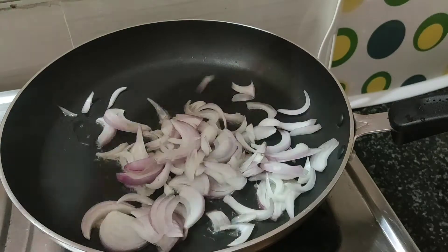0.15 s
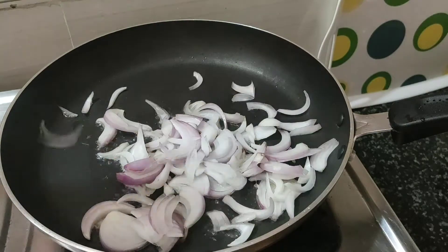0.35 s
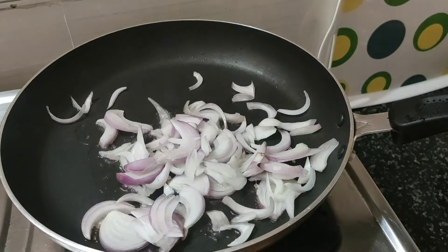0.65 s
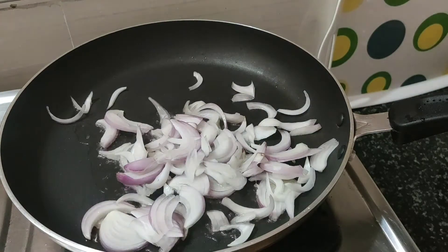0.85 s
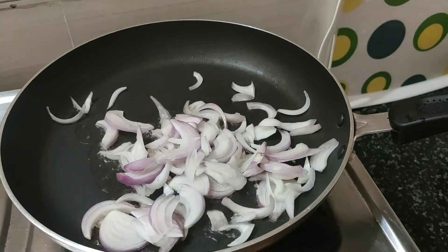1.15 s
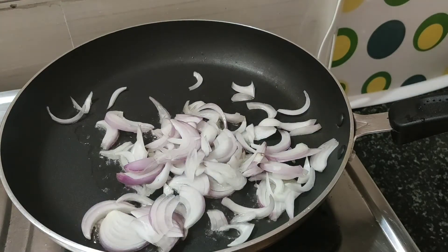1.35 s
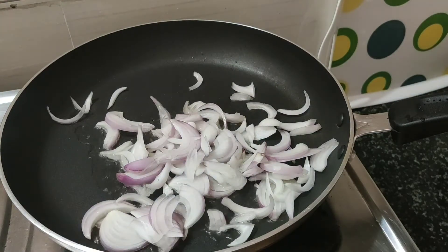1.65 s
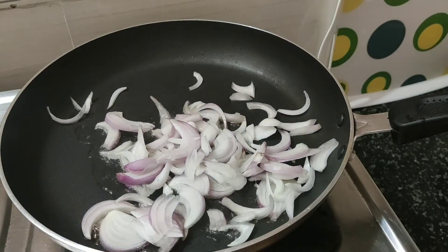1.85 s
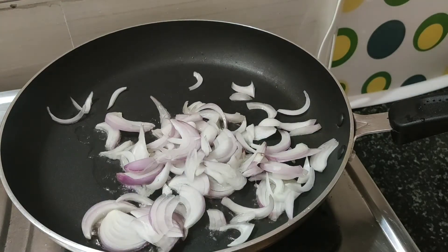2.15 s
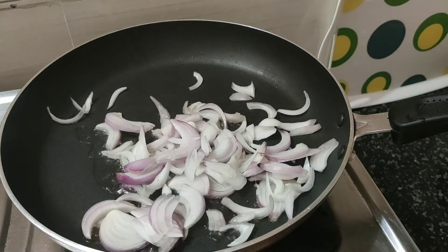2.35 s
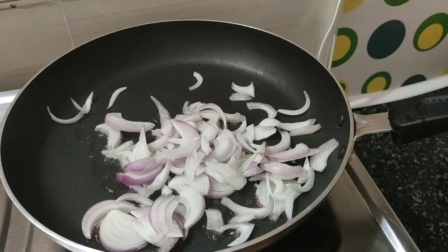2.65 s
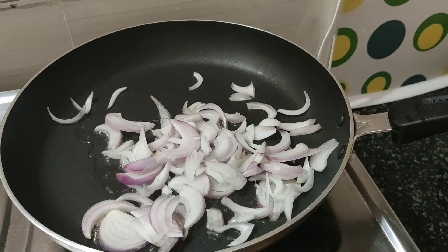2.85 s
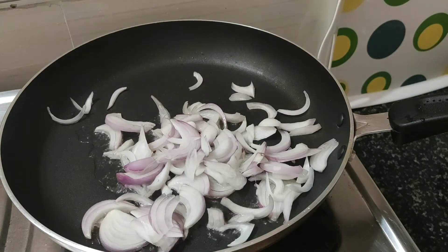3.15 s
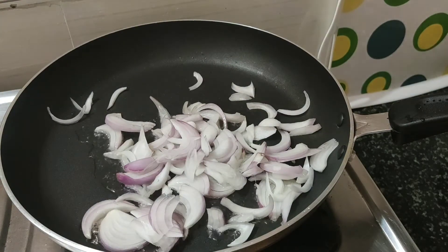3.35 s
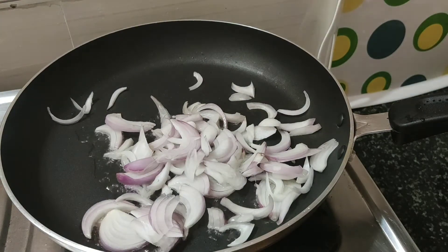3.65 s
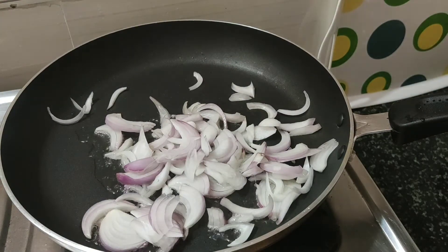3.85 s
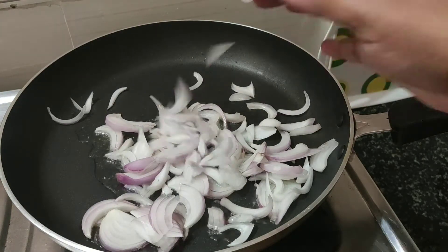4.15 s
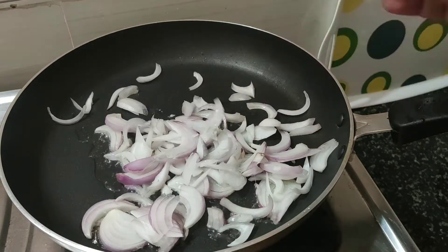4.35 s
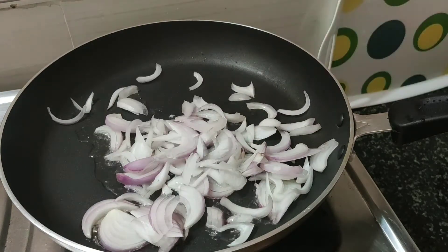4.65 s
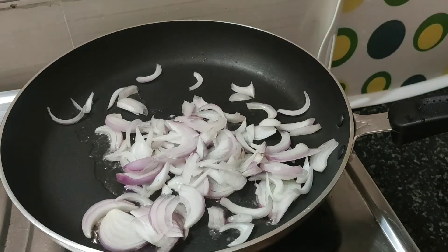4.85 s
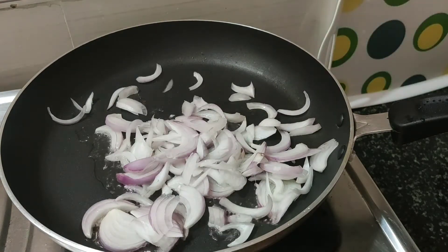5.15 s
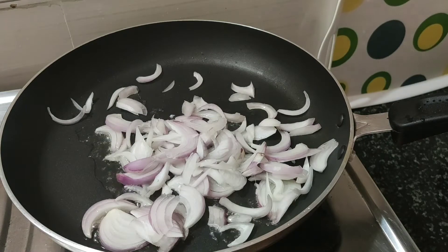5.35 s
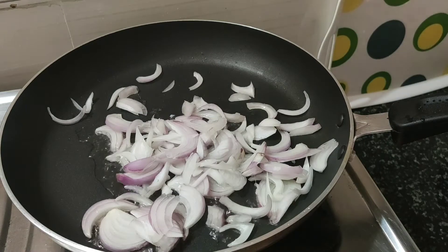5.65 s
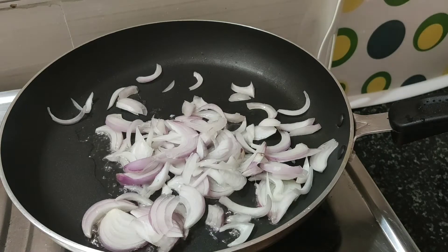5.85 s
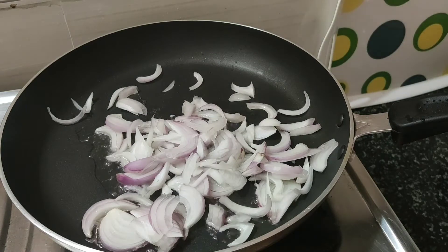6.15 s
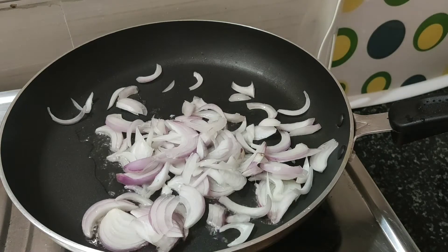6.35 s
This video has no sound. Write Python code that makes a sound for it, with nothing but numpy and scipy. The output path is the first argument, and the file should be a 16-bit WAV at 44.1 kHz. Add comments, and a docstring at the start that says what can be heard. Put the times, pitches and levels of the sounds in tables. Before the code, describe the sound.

Onion slices fry in hot oil, heard very close in a small tiled kitchen with short reflections. From 0 to about 0.5 s the sizzle is at its fiercest: bright, wide, grainy hiss crowded with sharp spits and a few dull ticks from the pan, one strong crack near 0.5 s. Over the next two seconds it sinks to a steady, crisp simmer with finer crackle and occasional pops. A quiet low hum underneath fades almost away around 3.1 s, then returns. A very sharp pop snaps at 3.4 s, toward the right. From about 4.5 s the sizzle swells gently. At 5.3 s, after a spit and a tiny gritty scrape, a utensil lands with a loud hard clack, bounces in quick clatters and rocks to rest with duller knocks by 5.6 s, ringing briefly. Simmering and small spits continue to about 6.5 s.

```python
"""Sliced onions sizzle in a frying pan, close to a phone in a small tiled kitchen.
At first the sizzle flares, as resonant bursts of thousands of steam bubbles, and drops spit as noise bursts.
It then settles to a simmer, over a low hum of two beating tones that nearly cancel about halfway through.
Near the end late slices swell the sizzle, and a utensil scrapes, lands, bounces and rocks to rest:
each contact sums damped modes and decaying noise."""
import sys
import numpy as np
from scipy import signal
from scipy.fft import rfft, irfft
from scipy.io import wavfile
from scipy.ndimage import uniform_filter1d

SR = 44100
rng = np.random.default_rng(int(sys.argv[2]) if len(sys.argv) > 2 else 0)


def file_out(sig):
    """Save sig as 16-bit WAV at sys.argv[1]."""
    # one column per channel
    cols = np.atleast_2d(sig).T
    # limit, then scale
    lim = np.clip(cols, -1, 1)
    pcm = np.round(lim * 32767).astype(np.int16)
    wavfile.write(sys.argv[1], SR, pcm)


N = 286650
T = np.arange(N) / SR

# Spectra of the low rumble and of the draught: f/Hz, relative level/dB
RUMBLE_SPECTRUM = [(35, -20), (55, -12), (80, 5.5), (105, 6), (130, 0.5), (165, -16), (225, -28.5),
                   (300, -19), (370, -27), (470, -33), (600, -19)]
DRAUGHT_SPECTRUM = [(12, -9), (25, 2.5), (38, -26), (60, -9)]
# Course of the draught: t/s, relative level/dB
DRAUGHT_COURSE = [(0.0, -61), (1.47, -61), (1.74, -67), (2.75, -58.5), (3.12, -63.5), (3.7, -59.5),
                  (4.74, -55.5), (5.94, -67), (6.14, -65), (6.5, -64)]
# Difference between the two microphones: f/Hz, side minus mid level/dB
SIDE_SPECTRUM = [(25, -30), (100, -45), (200, -16), (300, -4), (600, -6.5), (1000, 1), (1500, 1),
                 (3000, -0.5), (5200, 3.5), (7000, -0.5), (15000, -0.5)]
# Modes of the utensil: f/Hz, relative level/dB, reverberation time t60/s
UTENSIL_MODES = [(70.6, -4, 0.54), (230.5, -4, 0.31), (273, -0.5, 0.15), (473, 5.5, 0.15), (566, -3, 0.28),
                 (834, 2, 0.25), (927, -1, 0.19), (975, 5, 0.19), (1015, -1, 0.23), (1135, 7, 0.14),
                 (1370, 1, 0.17), (2306, 0.5, 0.19), (3760, -5, 0.08), (4135, -2, 0.16), (4470, -2, 0.11),
                 (4580, 1, 0.24), (5520, 2.5, 0.13), (6300, 0.5, 0.093), (6400, 3, 0.16)]
# Spectra of the utensil's clatter and of its hard clack: f/Hz, relative level/dB
CLATTER_SPECTRUM = [(180, -25), (230, -2), (320, 1.5), (385, -8), (460, -13), (680, -3.5), (850, 2),
                    (1150, 4), (1450, -3.5), (1950, -5.5), (2250, -6), (2900, -12), (3700, -6), (4500, 2),
                    (5500, -16), (5900, -34), (7000, -13)]
CLACK_SPECTRUM = [(800, 12), (1200, 17), (1700, -8), (2400, -8), (3000, -20), (3400, 7.5), (4500, 10.5),
                  (5500, 9), (5950, -20)]
# Contacts as the utensil lands, bounces and rocks to rest with dull knocks:
# t/s, strength level/dB, treble level/dB, relative clack level/dB
UTENSIL_CONTACTS = [(5.3409, 4, 3, 3.5), (5.3571, -1.5, -2, -6), (5.417, 0, 3, -2.5), (5.4624, -1.5, 3, 2),
                    (5.489, -5, 6.5, 1), (5.5052, -4, 6, -1), (5.518, -7.5, 0, 7), (5.527, -6, -7, 8),
                    (5.534, -7.5, -2, -6), (5.554, -8, -15, -3), (5.584, -7, -19, 2),
                    (5.598, -8.5, -19, -3), (5.616, -13, -14, -2)]
# Soft bumps: t/s, relative level/dB
SOFT_BUMPS = [(0.327, -47), (0.487, -47), (2.127, -51), (5.248, -48), (5.676, -45)]
# Duller ticks of onion and oil on the pan: t/s, relative peak level/dB, resonance f/Hz
PAN_TICKS = [(0.0467, -22, 2600), (0.132, -29, 2910), (0.4313, -18.5, 2650), (0.446, -24, 2600),
             (0.495, -25, 3000), (0.607, -32.5, 1570), (1.45, -32, 2050), (2.529, -33, 2860),
             (2.887, -29, 1700), (2.897, -37, 1720), (4.231, -32.5, 1200)]
# Blunt snaps of the biggest bursts: t/s, peak level/dB, left minus right level/dB
BURST_SNAPS = [(0.0493, -19, 1), (0.4317, -31, 0), (3.3859, -17.5, -19)]
# Loudest spitting drops: t/s, relative crack peak level/dB, resonance f/Hz,
# relative steam fizz level/dB, boil-off time constant/s, relative unpitched splash level/dB
SPITTING_DROPS = [(0.0075, -1, 9000, -18, 0.0044, 2), (0.0456, 7, 7100, -13.5, 0.0035, -2),
                  (0.073, -3, 9500, -25, 0.012, 5), (0.091, -7, 5450, -21, 0.0046, -16),
                  (0.118, 1, 9500, -22, 0.012, 6), (0.1334, -1, 6070, -17.5, 0.0054, -5),
                  (0.160, 2.5, 10000, -20, 0.012, -2), (0.188, -11, 7300, -28, 0.004, -17),
                  (0.216, -10, 9000, -30, 0.0066, -16), (0.303, -13, 11500, -25.5, 0.01, -21),
                  (0.335, -6, 12500, -25, 0.0033, -19), (0.3631, -4, 6600, -24.5, 0.005, -22),
                  (0.4960, 9, 10100, -18, 0.0083, 7), (0.787, -8, 10400, -26, 0.0033, -5),
                  (0.833, -8, 5100, -20.5, 0.01, -8), (0.866, 1, 10500, -31, 0.007, -1),
                  (0.945, -9, 10000, -29, 0.01, -16), (1.143, -18, 5050, -33, 0.005, -20),
                  (1.215, -14, 9150, -30, 0.0087, -15), (1.394, -15, 6620, -29, 0.005, -20),
                  (1.4505, -10, 7400, -25, 0.005, 11), (1.498, -13, 6500, -28, 0.01, 3),
                  (1.613, -6, 12500, -24.5, 0.01, -11), (1.8986, -15, 7880, -30, 0.01, -1),
                  (2.6787, -3, 8890, -39, 0.004, -2), (2.782, -1, 8200, -32, 0.004, -6),
                  (2.7925, -11, 7800, -26.5, 0.006, -10), (3.1552, -2, 5250, -32, 0.009, -17),
                  (3.1933, -5, 7980, -37, 0.006, -13), (3.3852, 11, 5600, -18.5, 0.0083, -10),
                  (3.454, -6, 8000, -30, 0.0064, -18), (3.8724, -8.5, 4400, -30, 0.007, -14),
                  (4.224, -3.5, 7400, -27, 0.0073, 3), (5.258, 5, 6700, -27.5, 0.011, -11),
                  (5.89, -22, 4040, -30, 0.02, -8), (6.0128, -1, 10500, -32, 0.004, -2),
                  (6.111, -17, 5510, -37, 0.003, -18), (6.209, -10, 5100, -33, 0.0056, -18),
                  (6.4334, -6, 5030, -27, 0.0066, -12)]
# Spectra of the dry clicks, crackle, sputter and sizzle: f/Hz, relative level/dB
PRICK_SPECTRUM = [(1800, -5), (3500, -61), (7000, -2), (11000, 13.5), (15500, -18)]
CRACKLE_SPECTRUM = [(220, -20), (300, 3.5), (390, -8.5), (490, -0.5), (550, -8.5), (650, 4), (790, -4.5),
                    (890, 2.5), (990, 3), (1100, -5), (1280, -7.5), (1480, -0.5), (1750, -1.5), (2300, 3)]
SPUTTER_SPECTRUM = [(2200, -11), (2850, 3), (3500, 6), (4000, 0.5), (5200, 8.5), (6500, -4)]
SIZZLE_SPECTRUM = [(1200, -17.5), (1500, -13.5), (1750, -18), (2100, -11), (2550, -10.5), (2900, -8.5),
                   (4200, -7.5), (5200, -6.5), (7000, -0.5), (8300, 1), (10000, 0.5), (12000, -0.3),
                   (14200, -2), (15800, -0.5), (16400, -58)]

# The hum: two nearly equal tones, with the moment at which they cancel
HUM_HZ, HUM_DB, HUM_BEAT_HZ, HUM_NULL_S, HUM_MISMATCH = 100.6, -47.5, 0.23, 3.104, 0.02
RUMBLE_DB = -52  # at the top of a beat
# The scrape before the utensil lands
SLIDE_S, SLIDE_DB, SLIDE_GRAINS_PER_S = 0.029, -31.5, 3200
# The flare as the onions meet the oil has halved, in dB, after FLARE_S
SIMMER_DB, FLARE_DB, FLARE_S = -36, 8.5, 1
# The swell as a few late slices heat through
SWELL_AT_S, SWELL_DB, SWELL_WIDTH_S = 5.41, 3, 0.94
TOP_HZ = 16000


def undb(db):
    """Amplitude ratio: ten to the level in decibels over twenty."""
    return 10 ** (np.asarray(db) / 20)


def unit(x):
    """Normalization to unit root-mean-square value."""
    return x / np.sqrt(np.mean(x ** 2))


def decay(t, t60):
    """Exponential decay: the amplitude falls by 60 dB in the time t60."""
    return np.exp(-np.log(1000) * t / t60)


def balance(left_minus_right_db):
    """Intensity stereo: a level difference shared equally between two channels."""
    return undb(np.array([[left_minus_right_db], [-left_minus_right_db]]) / 2)


def response(points, size):
    """Frequency response: levels interpolated along logarithmic frequency at the transform bins."""
    hz, db = np.transpose(points)
    bins_hz = np.fft.rfftfreq(size, 1 / SR) + 1
    return undb(np.interp(np.log(bins_hz), np.log(hz), db))


def colour(x, points):
    """Linear filtering: a spectrum is imposed, with steep skirts beyond its end points."""
    size = x.shape[-1] + SR // 10
    hz = np.fft.rfftfreq(size, 1 / SR) + 1
    lowest_hz, highest_hz = points[0][0], points[-1][0]
    skirts = np.minimum(1, np.minimum(hz / lowest_hz, highest_hz / hz)) ** 4
    filtered = irfft(rfft(x, size) * response(points, size) * skirts, size)
    return filtered[..., :x.shape[-1]]


def band(x, hz, q):
    """Resonance: a second-order peak, with its frequency and bandwidth kept below SR / 3."""
    limit_hz = SR / 3
    hz = min(hz, limit_hz)
    b, a = signal.iirpeak(hz, max(q, hz / limit_hz), fs=SR)
    return signal.lfilter(b, a, x)


def walk(rate):
    """Slow random fluctuation: random steps at a given rate, smoothed twice, with rms 1."""
    size = int(SR / rate)
    steps = np.repeat(rng.standard_normal(N // size + 1), size)
    smooth = uniform_filter1d(uniform_filter1d(steps, size), size)
    return unit(smooth[:N])


def add(out, s, sound):
    """Superposition: a sound is summed in from a given time in seconds."""
    start = max(int(s * SR), 0)
    out[:, start:start + sound.shape[1]] += sound[:, :N - start]


def ports(pair):
    """Spatial coherence: long waves reach both microphones alike, short ones differ."""
    middle = pair[0] + pair[1]
    side = irfft(rfft(pair[0] - pair[1]) * response(SIDE_SPECTRUM, N), N)
    return (middle + np.array([side, -side])) / 2


def kitchen(x, pan_db, room_db):
    """Reverberation: the direct path, quick echoes off pan and tiles, and the longer room tail."""
    t = T[:SR // 3]
    near, far = rng.standard_normal((2, 2, len(t)))
    paths = np.zeros_like(near)
    # the direct sound reaches the left microphone up to 9 samples late
    paths[0, rng.integers(0, 10)] = 1
    paths[1, 0] = 1
    for noise, db, t60 in ((near, pan_db, .04), (far, room_db, .28)):
        tail = noise * decay(t, t60)
        paths += undb(db) * unit(tail) / np.sqrt(len(t))
    paths = paths / np.sqrt(np.sum(paths ** 2) / 2)
    return signal.fftconvolve(x[None], paths, axes=1)[:, :len(x)]


def stove(waver_rad=0.18, flutter_db=0.1, draught_db=7):
    """Beats: two close tones interfere; hum and rumble fade together, over a slow draught."""
    phase = 2 * np.pi * HUM_HZ * T + waver_rad * walk(14)
    slip = 2 * np.pi * HUM_BEAT_HZ * (T - HUM_NULL_S)
    beat = 1 - (1 - HUM_MISMATCH) * np.exp(-1j * slip)
    hum = np.imag(beat * np.exp(1j * phase)) * undb(HUM_DB + flutter_db * walk(8))
    rumble = unit(colour(ports(rng.standard_normal((2, N))), RUMBLE_SPECTRUM))
    rumble = rumble * np.sqrt(np.abs(beat) / 2) * undb(RUMBLE_DB)
    draught = unit(colour(ports(rng.standard_normal((2, N))), DRAUGHT_SPECTRUM))
    gust_s, gust_db = np.transpose(DRAUGHT_COURSE)
    return hum + rumble + draught * undb(np.interp(T, gust_s, gust_db) + draught_db)


def slide():
    """Friction: sparse random grains swell in a short gritty scrape until the utensil lands."""
    lands_s = UTENSIL_CONTACTS[0][0]
    grit = rng.standard_normal((2, N)) * (rng.random(N) < SLIDE_GRAINS_PER_S / SR)
    swell = np.sqrt(np.clip(1 + (T - lands_s) / SLIDE_S, 0, 1)) * (T < lands_s)
    return unit(colour(grit, CLATTER_SPECTRUM)) * swell * undb(SLIDE_DB)


def ringing(t, spot_db=2, detune=.006):
    """Modal superposition: damped modes vary in level and frequency with the spot struck."""
    phases = rng.uniform(0, 2 * np.pi, (len(UTENSIL_MODES), 2, 1))
    spots = rng.uniform(-1, 1, (len(UTENSIL_MODES), 2))
    ring = 0
    for (hz, mode_db, t60), phase, (weight, shift) in zip(UTENSIL_MODES, phases, spots):
        mode = np.sin(2 * np.pi * hz * (1 + detune * shift) * t + phase) * decay(t, t60)
        ring = ring + undb(mode_db + spot_db * weight) * mode
    return ring


def utensil(ring_db=-35, clatter_db=-20.5, clack_db=-22.0, clack_t60=0.016, treble_hz=2200, pan_db=-1.5):
    """Impact: each contact excites a hard clack, clatter and a ring; the last ones lack treble."""
    out, t = np.zeros((2, N)), T[:SR // 2]
    echo = undb(-12) * decay(t, .22)
    clatter_fade = np.hypot(decay(t, .08), echo)
    lowpass = signal.butter(1, treble_hz, fs=SR, output="sos")
    for s, db, treble_db, hard_db in UTENSIL_CONTACTS:
        ring = ringing(t)
        clatter = unit(colour(rng.standard_normal((2, len(t))), CLATTER_SPECTRUM)) * clatter_fade
        clack = unit(colour(rng.standard_normal((2, len(t))), CLACK_SPECTRUM)) * decay(t, clack_t60)
        blow = undb(ring_db) * ring + undb(clatter_db) * clatter + undb(clack_db + hard_db) * clack
        low = signal.sosfilt(lowpass, blow)
        add(out, s, undb(db) * (low + undb(treble_db) * (blow - low)))
    return ports(out + slide()) * balance(pan_db)


def taps(tick_db=3, tick_q=0.88, tick_body_hz=900, bump_s=0.0047):
    """Damped response: impulses excite broad resonances as ticks; low noise swells as soft bumps."""
    out, t = np.zeros((2, N)), T[:SR // 4]
    for s, db, hz in PAN_TICKS:
        tick = kitchen(signal.unit_impulse(len(t)), pan_db=2, room_db=1)
        tick = band(band(tick, hz, tick_q), tick_body_hz, 0.45)
        add(out, s, tick / np.abs(tick).max() * undb(db + tick_db))
    for s, db in SOFT_BUMPS:
        thud = unit(colour(rng.standard_normal((2, len(t))), [(170, -7.0), (240, 2), (380, -12)]))
        envelope = t / bump_s * np.exp(1 - t / bump_s)
        add(out, s, thud * envelope * undb(db))
    return ports(out)


def snaps(width_s=0.000073):
    """Monopole radiation: the biggest bursts push out one blunt pulse of air."""
    out, t = np.zeros((2, N)), T[:SR // 50]
    pulse = band(t / width_s * np.exp(-t / width_s), 380, 0.39)
    for s, db, pan_db in BURST_SNAPS:
        add(out, s, pulse / pulse.max() * undb(db) * balance(pan_db))
    return out


def splash(x, hz, pitch_q, broad_db):
    """Resonance with direct radiation: a pitched part and an unpitched part share one spectrum."""
    return colour(band(x, hz, pitch_q) + undb(broad_db) * x, SIZZLE_SPECTRUM)


def spits(crack_db=-10.5, fizz_db=-2, pitch_q=3.1, crack_splash_db=3, grains_per_s=2800,
          burst_s=0.00092, crack_s=0.00039):
    """Explosive boiling: a water drop cracks open and boils off in a grainy fizz that swells and dies."""
    out, t = np.zeros((2, N)), T[:SR // 4]
    for s, peak_db, hz, steam_db, boil_s, splash_db in SPITTING_DROPS:
        crack = kitchen(rng.standard_normal(len(t)) * np.exp(-t / crack_s), pan_db=-7, room_db=-5)
        crack = splash(crack, hz, pitch_q, splash_db + crack_splash_db)
        add(out, s + burst_s, crack / np.abs(crack).max() * undb(peak_db + crack_db))
        age = t / max(boil_s, 1 / SR)
        grains = rng.standard_normal(len(t)) * (rng.random(len(t)) < grains_per_s / SR)
        fizz = kitchen(grains * np.sqrt(age) * np.exp(-age), pan_db=-4, room_db=-2)
        fizz = splash(fizz, hz, pitch_q, splash_db)
        # the fizz is scaled by its strength over the first 20 ms
        add(out, s, fizz / fizz[:, :SR // 50].std() * undb(steam_db + fizz_db))
    return out


def pinpricks(per_s=200, spread_db=1.5, prick_db=9.5):
    """Direct sound: bubbles on the open oil face the microphones and snap as single dry clicks."""
    out = np.zeros((2, N))
    for when, loud, place, sign in rng.random((int(per_s * N / SR), 4)):
        start = int(when * (N - 20))
        size = undb(-spread_db * np.log(max(loud, .02))) * np.sign(sign - .5)
        out[0, start + int(12 * place)] = size  # the left hears it up to 11 samples late
        out[1, start] = size
    return colour(out, PRICK_SPECTRUM) * undb(prick_db)


def bubbles(pitches_hz, width_hz, per_s, spread_db, flurry_db):
    """Random point process: bubbles of each size burst in flurries at their own spot of the pan."""
    out = 0
    for hz in pitches_hz:
        bursts = rng.random(N) < per_s / len(pitches_hz) / SR
        # a positive spread makes a few bursts loud, a negative one makes a few faint
        size = undb(spread_db * np.minimum(rng.exponential(size=N), 6)) * rng.choice([-1, 1], N)
        flurry = undb(flurry_db * walk(140))
        popping = band(bursts * size * flurry, hz, hz / width_hz)
        out = out + kitchen(popping, pan_db=-4, room_db=-2)
    return ports(out)


def heat(t):
    """Boiling rate, as a level in decibels: a fading flare, a simmer and a late swell."""
    flare_db = FLARE_DB / (1 + t / FLARE_S)
    swell_db = SWELL_DB * np.exp(-((t - SWELL_AT_S) / SWELL_WIDTH_S) ** 2)
    return SIMMER_DB + flare_db + swell_db


def frying(sizzle_db=2.0, sputter_db=-9.0, crackle_db=-20.0, surge_db=0.5, surges_per_s=25):
    """Bubble resonance by size: fine surging sizzle, coarser sputter, dull crackle under the onions."""
    small_hz = np.linspace(1500, 16000, 14)
    middle_hz = np.linspace(2500, 6000, 7)
    large_hz = np.linspace(400, 1900, 6)
    sizzle = bubbles(small_hz, width_hz=1640, per_s=8000, spread_db=-0.5, flurry_db=3.0)
    sputter = bubbles(middle_hz, width_hz=310, per_s=700, spread_db=3.0, flurry_db=3.0)
    crackle = bubbles(large_hz, width_hz=1250, per_s=5000, spread_db=4.0, flurry_db=0.85)
    surge = undb(sizzle_db + surge_db * walk(surges_per_s))
    sizzle = unit(colour(sizzle, SIZZLE_SPECTRUM)) * surge
    sputter = unit(colour(sputter, SPUTTER_SPECTRUM)) * undb(sputter_db)
    crackle = unit(colour(crackle, CRACKLE_SPECTRUM)) * undb(crackle_db)
    return (sizzle + sputter + crackle + pinpricks()) * undb(heat(T))


def scene(pan_db=-0.5):
    """Superposition of all sources, with the pan a little to the right."""
    background = stove() + utensil()
    pan = (taps() + spits() + frying()) * balance(pan_db)
    return background + snaps() + pan


def record(dry):
    """Saturation and band limiting: the phone rounds the loudest peaks and cuts the top."""
    rounded = np.tanh(dry)
    lowpass = signal.ellip(10, .2, 80, TOP_HZ, fs=SR, output="sos")
    return signal.sosfilt(lowpass, rounded)


dry = scene()
out = record(dry)
file_out(out)
```